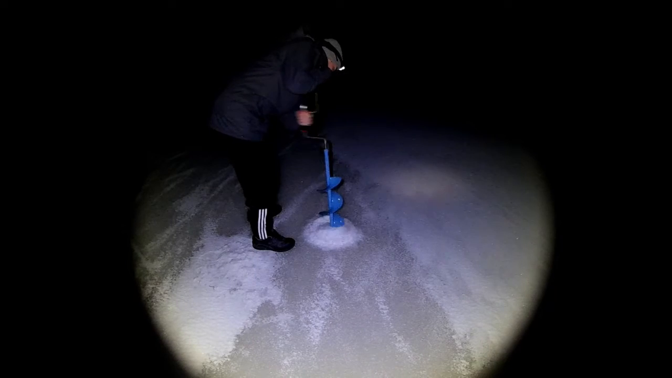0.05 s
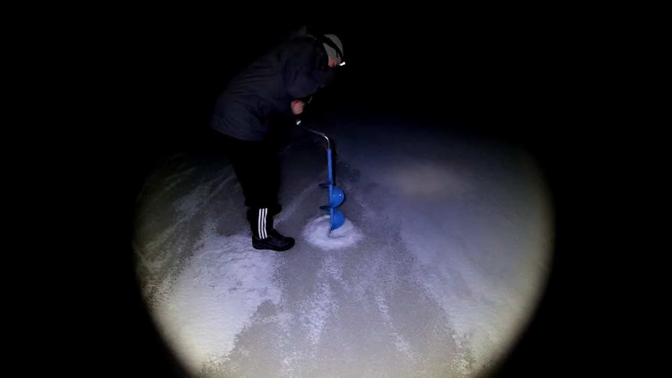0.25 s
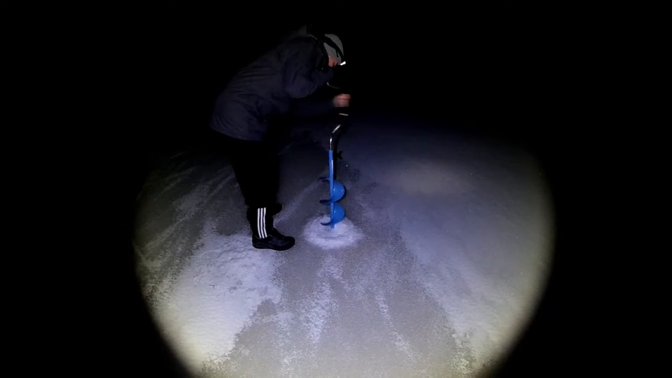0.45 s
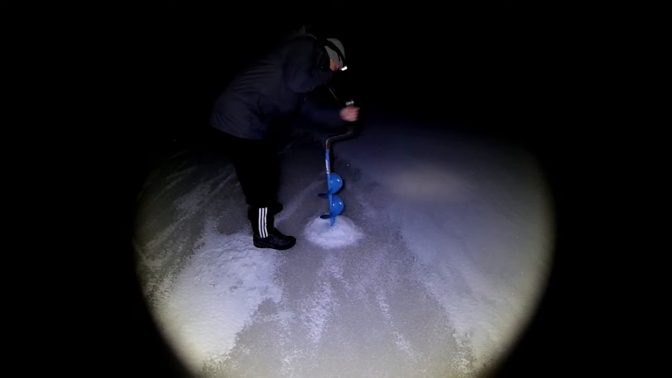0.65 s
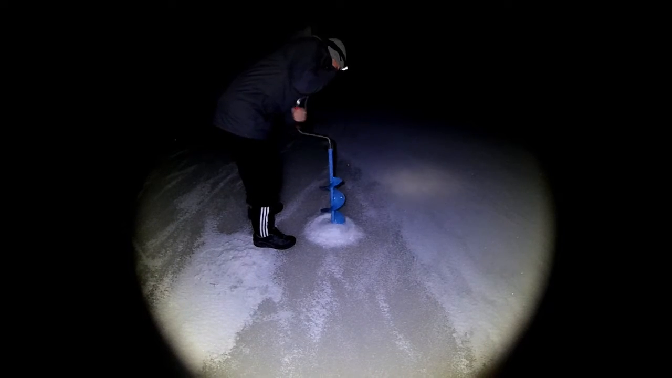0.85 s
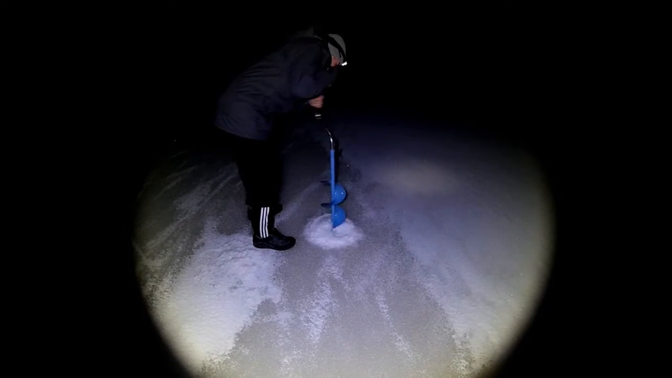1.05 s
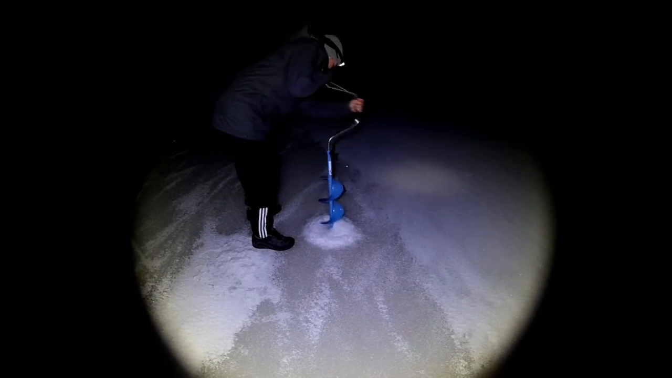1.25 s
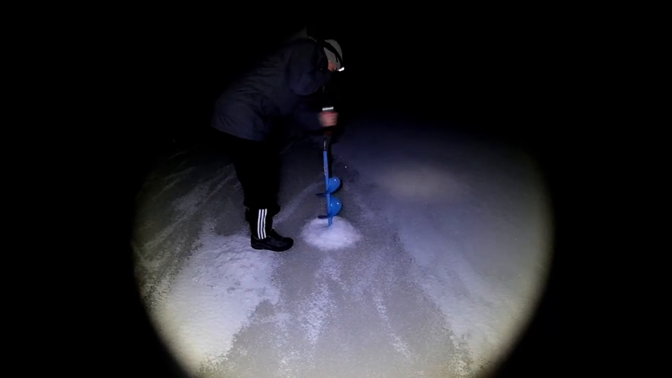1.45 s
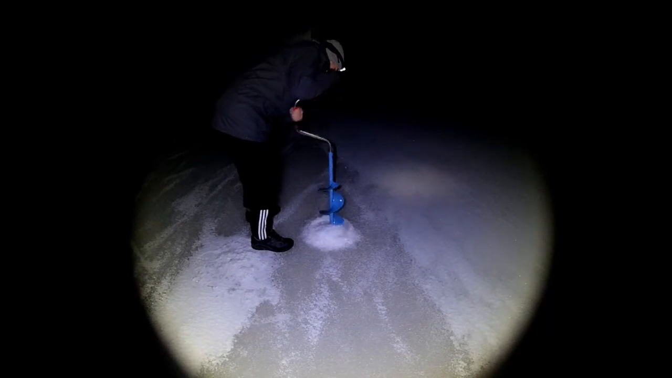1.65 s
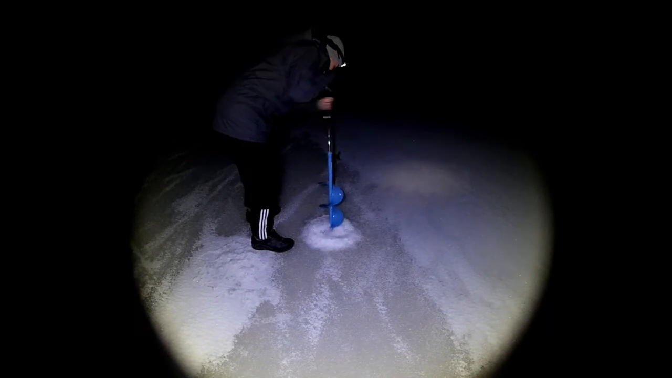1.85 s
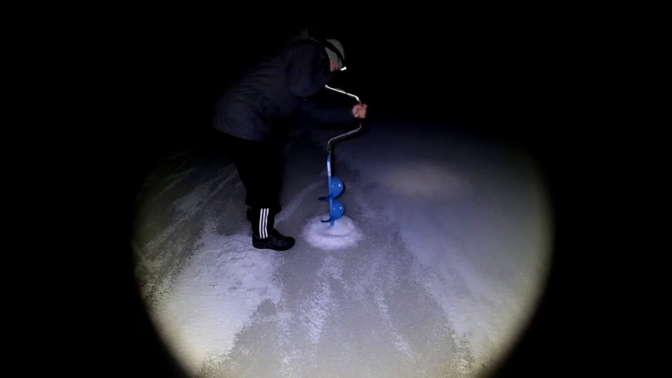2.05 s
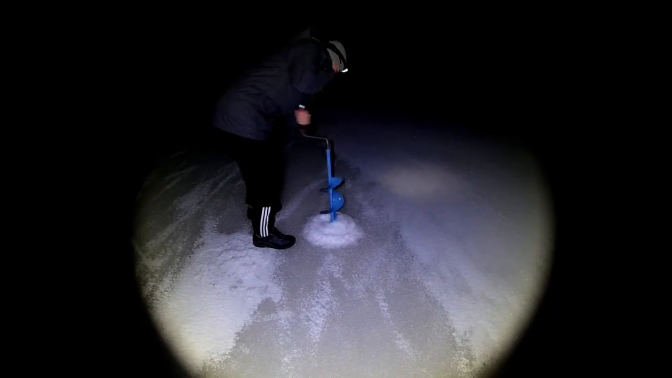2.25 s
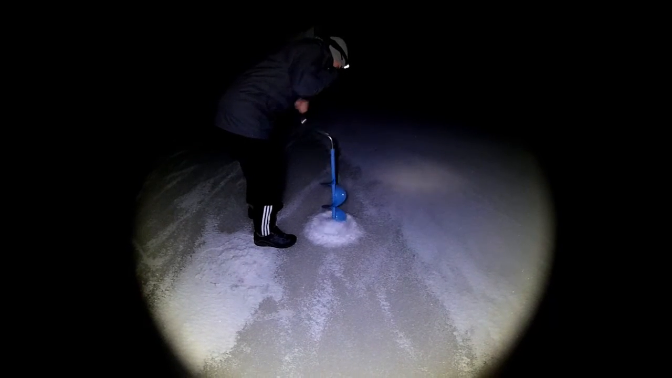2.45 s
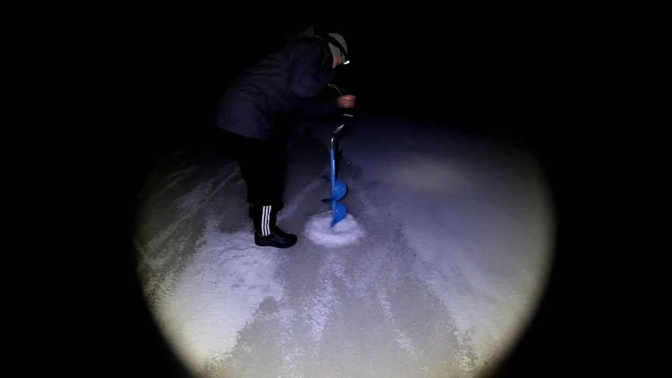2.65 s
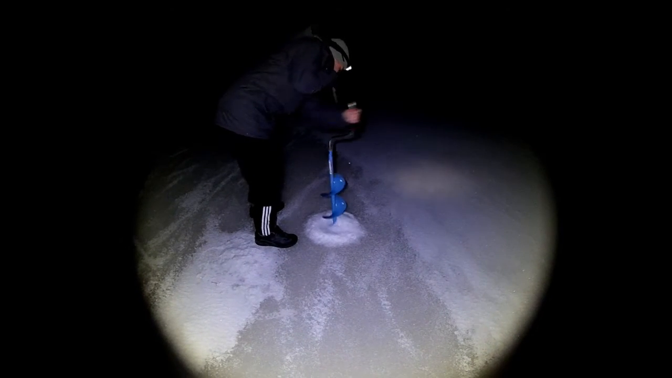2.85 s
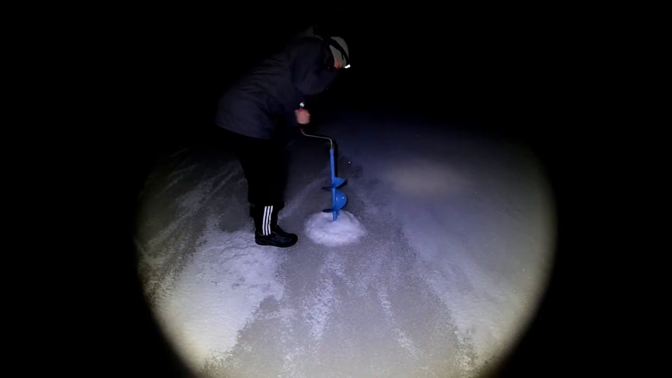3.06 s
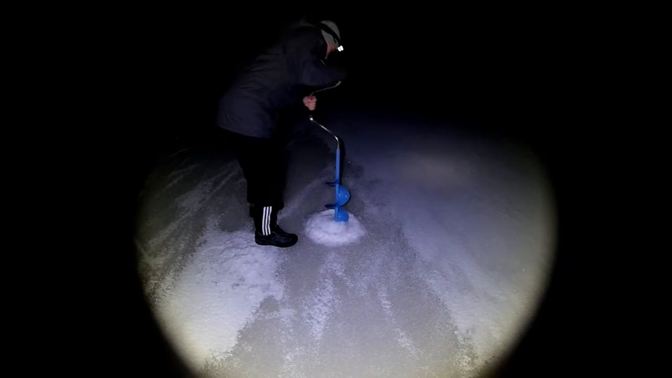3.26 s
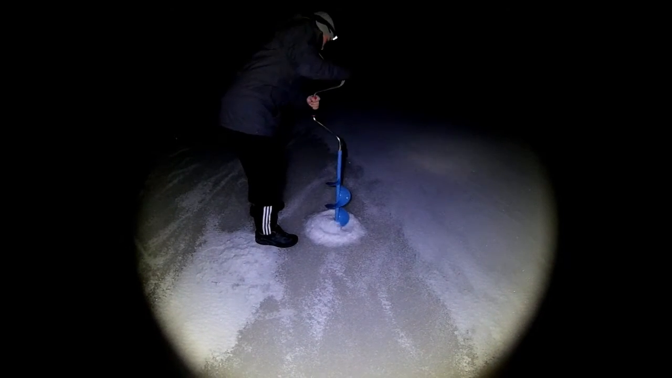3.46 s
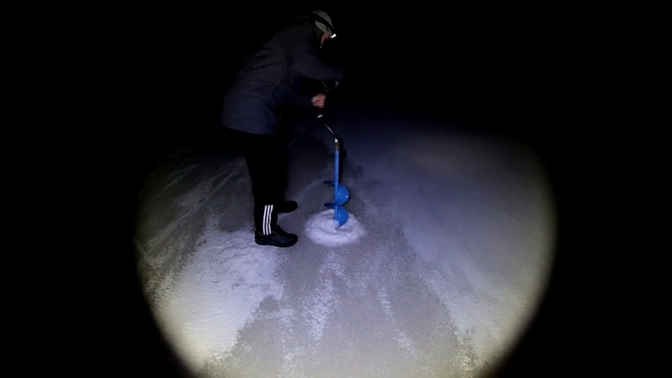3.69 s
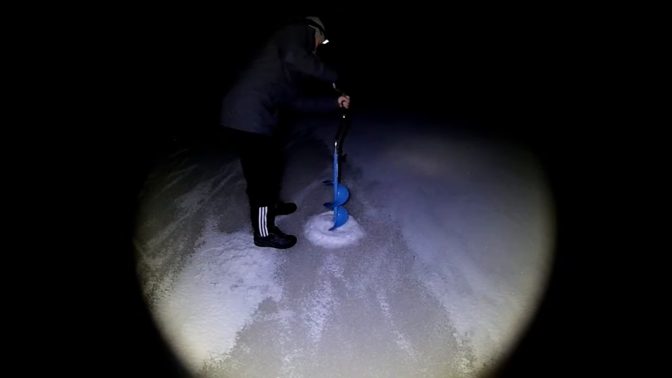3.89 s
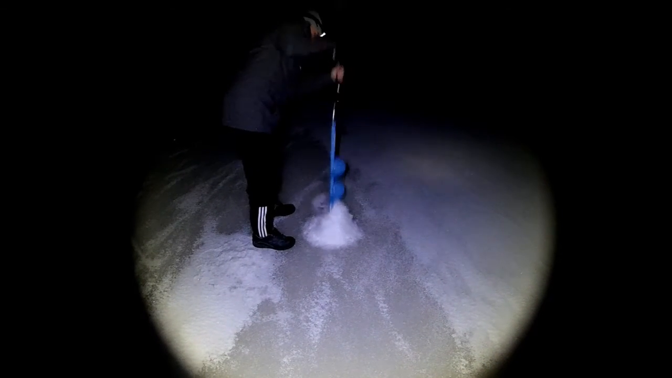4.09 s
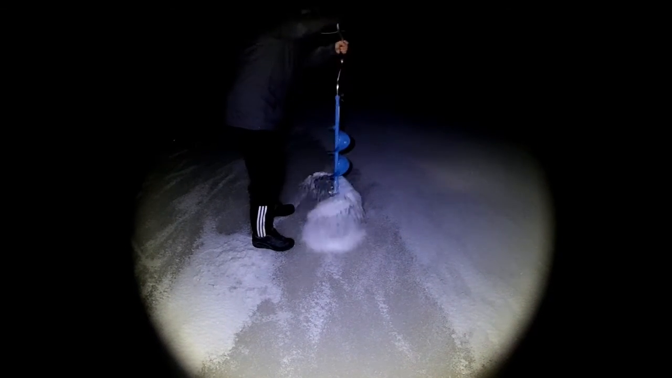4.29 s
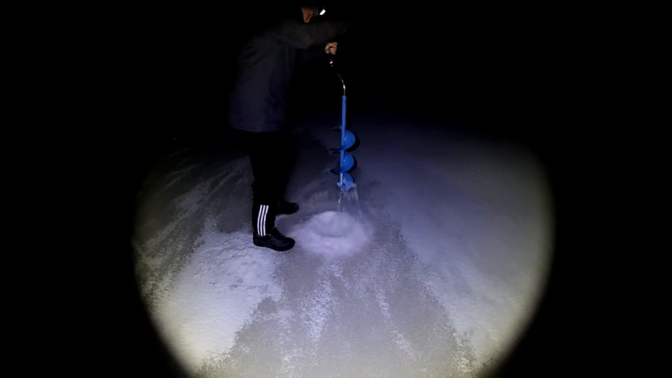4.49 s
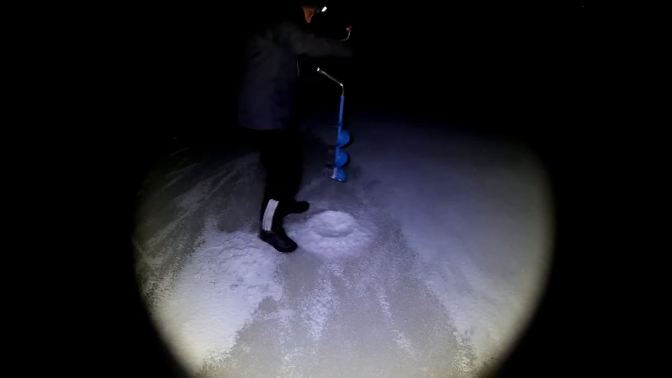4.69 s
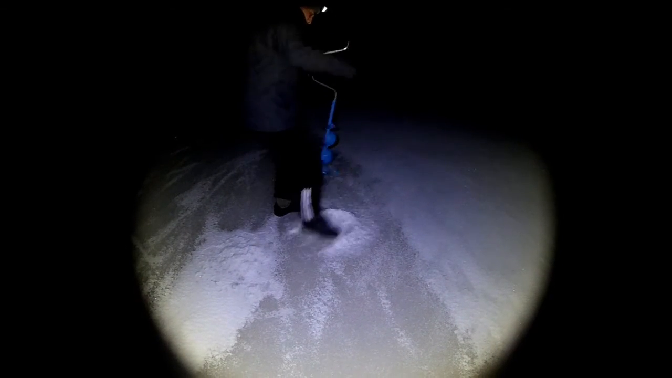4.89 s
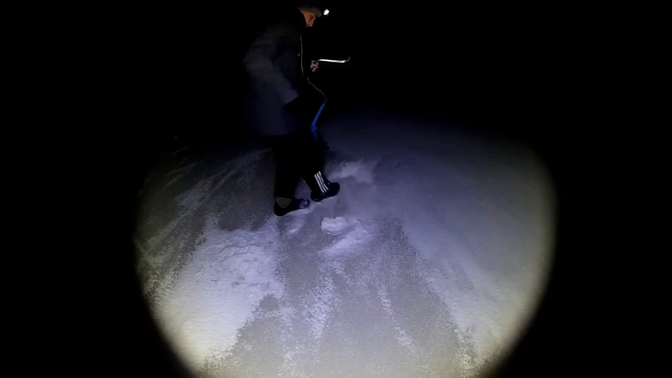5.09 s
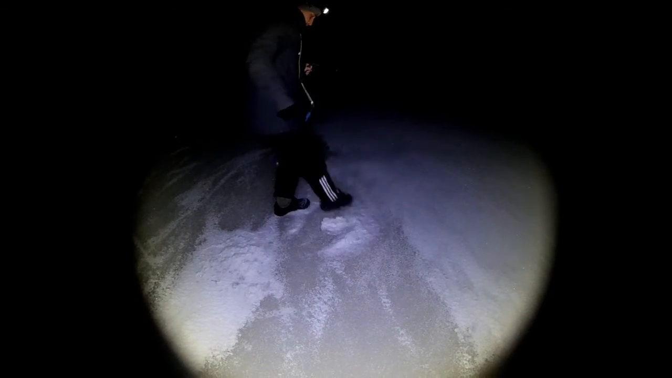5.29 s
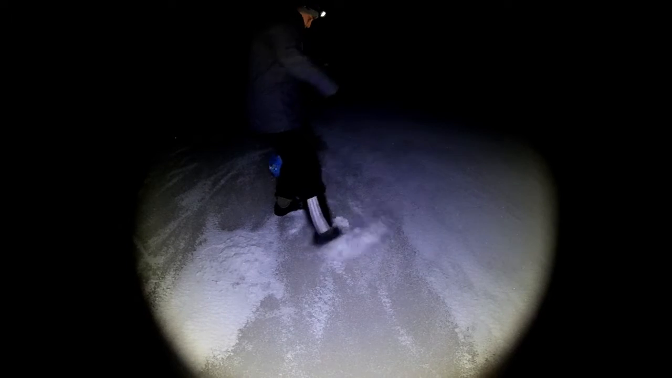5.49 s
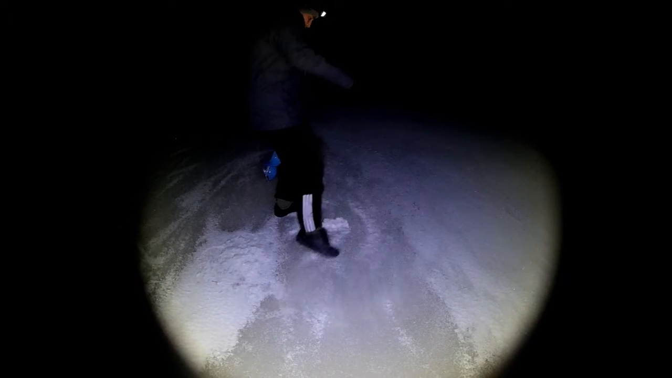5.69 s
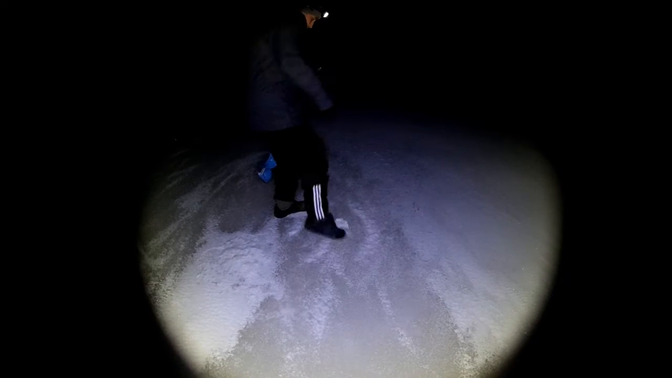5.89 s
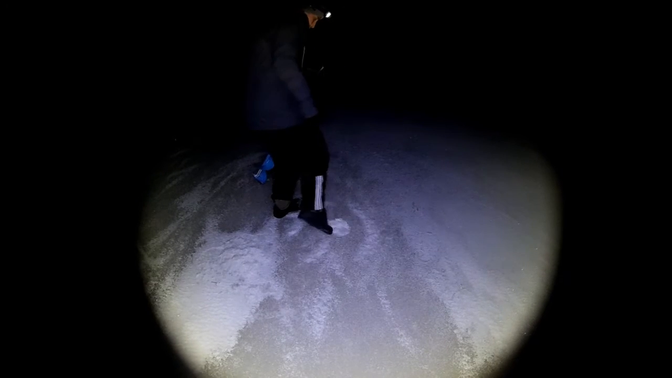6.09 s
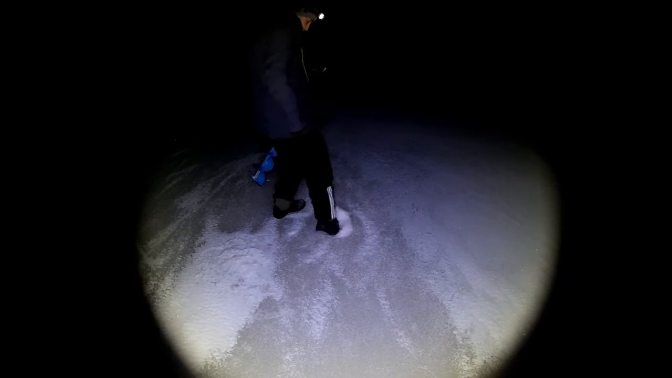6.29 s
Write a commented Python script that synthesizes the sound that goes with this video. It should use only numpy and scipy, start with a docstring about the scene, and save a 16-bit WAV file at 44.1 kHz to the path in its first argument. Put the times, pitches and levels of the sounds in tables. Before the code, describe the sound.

On an open frozen lake, close and without echo, a steel hand auger grinds loudly from the start until about 3.1 s. Each turn lasts roughly 0.75 s: a rough, ringing scrape with upward-gliding resonances, fizzing fine shavings, a tiny very high squeak and a short singing tone near 1200 Hz. Sharp ice cracks jolt the steel, notably around 0.3, 1.0, 1.9, 2.3 and 2.7 s. The crank stalls abruptly; short rasping shoves follow from 3.1 to 3.9 s, the strongest at 3.5 s. From 4.1 to 4.6 s the auger lifts out with wet slush spilling and plopping. Boots scuff and crunch the heap at 4.7-4.85 s with a rising squelch, then again at 5.2-5.4 s with a metallic clank. Softer scuffs, knocks and faint steel pings continue around 5.65 and 6.05 s, while wet grains tick and patter over faint air noise to the end.

```python
"""Drilling a hole in lake ice by hand

A hand auger is cranked through lake ice at night, stalls, and breaks through with a few last shoves. Its blades
chip the ice: each tiny break makes the steel spiral ring, and its resonances glide with every turn. Fine
shavings fizz, the crank squeaks and, once a turn, the blades' stick-slip makes the steel sing. The auger is
pulled out with a spill of slush, boots scuff the heap aside, and wet grains patter on the ice."""
import sys
import numpy as np
from scipy import signal
from scipy.fft import rfft, irfft, next_fast_len
from scipy.io import wavfile
from scipy.ndimage import uniform_filter1d

SR = 44100
rng = np.random.default_rng(int(sys.argv[2]) if len(sys.argv) > 2 else 0)


def to_wav(s):
    """Save 16-bit WAV."""
    ch = np.atleast_2d(s).T  # columns
    pcm = np.round(np.clip(ch, -1, 1) * 32767)  # PCM
    wavfile.write(sys.argv[1], SR, pcm.astype(np.int16))


N = 279594  # length in samples
TIME = np.arange(N) / SR  # s
BINS_HZ = np.fft.rfftfreq(8192, 1 / SR)  # frequencies at which every colour is worked out


def amp(db):
    """Turns decibels into a gain."""
    return 10 ** (np.asarray(db) / 20)


def evened(x):
    """Scales a sound to an rms of one."""
    return x / np.sqrt(np.mean(x ** 2) + 1e-20)


def steady(x, size=1500):
    """Keeps the fine grain of a texture but holds its running level at one; size is in samples."""
    power = uniform_filter1d(uniform_filter1d(x ** 2, size), size)
    return x / np.sqrt(abs(power) + 1e-12)


def add(mix, s, sound):
    """Mixes a sound in at time s."""
    start = max(round(s * SR), 0)
    part = mix[start:][:len(sound)]
    part += sound[:len(part)]


def shape(points, modes=()):
    """Gain in dB over frequency: a broad colour with narrower resonances on top."""
    hz, db = np.transpose(points)
    gain_db = np.interp(np.log(BINS_HZ + 1), np.log(hz), db)
    for centre_hz, width_hz, peak_db in modes:
        gain_db = gain_db + peak_db / (1 + (2 * (BINS_HZ - centre_hz) / width_hz) ** 2)
    return gain_db


def ring(x, gain_db):
    """Each click in x rings with the given spectrum, and nothing sounds before its click."""
    log_gain = np.log(amp(np.r_[gain_db, gain_db[-2:0:-1]]))
    # the Hilbert transform supplies the phase that packs the response right after the click
    response = np.fft.ifft(np.exp(np.conj(signal.hilbert(log_gain)))).real
    return signal.oaconvolve(x, response[:len(response) // 2])[:len(x)]


def wander(rate_hz):
    """Smooth random curve of rms one; variations faster than about rate_hz fade out."""
    size = next_fast_len(N, True)
    hz = np.fft.rfftfreq(size, 1 / SR)
    spectrum = rfft(rng.standard_normal(size)) / (1 + (hz / rate_hz) ** 4)
    return evened(irfft(spectrum, size)[:N])


def grains(per_s, spread_db):
    """Random clicks from tiny fractures: many small, a few large."""
    chance, strength = rng.random((2, N))
    at = np.flatnonzero(chance < per_s / SR)
    excess = np.minimum(-np.log(1 - strength[at]), 4)  # the largest are capped
    train = np.zeros(N)
    train[at] = amp(spread_db * excess) * (-1.) ** (at % 2)  # pushes and pulls alike
    return train


def burst(t60, gain_db, snap):
    """One snap and a shower of splinters, fading 60 dB in t60 seconds, ring a body; peak of one."""
    t = TIME[:SR // 4]
    force = rng.standard_normal(len(t)) * amp(-60 * t / max(t60, 1e-3))
    force[0] += snap
    sound = ring(force, gain_db)
    return sound / abs(sound).max()


def stroke(s, hold, rise, fall):
    """Gain of one move: swells up to time s, holds, dies away; rise and fall are the times for 20 dB."""
    early = np.maximum(s - TIME, 0)
    late = np.maximum(TIME - s - hold, 0)
    return amp(-20 * np.minimum(early / rise + late / fall, 10))


def together(gains):
    """Separate moves add in power."""
    return np.sqrt(sum(gain ** 2 for gain in gains))


# colour of the night air: (frequency [Hz], relative level [dB per Hz])
AIR_COLOUR = [(12, -33), (20, -6), (113, -5), (187, -8), (527, -16.5), (759, -15.5), (849, -18.5),
              (1570, -15), (3250, -28.5), (5680, -34.5), (6180, -34), (12800, -36), (16000, -41)]
AIR_DB = -45


def air():
    """Random noise, coloured to a faint steady rumble and hiss over the open lake."""
    return amp(AIR_DB) * evened(ring(rng.standard_normal(N), shape(AIR_COLOUR)))


# the largest drops tick on the ice: (time [s], peak level before a 5.5 dB lift [dB])
DRIPS = [(5.5567, -23), (5.6181, -23.5), (5.6396, -22), (5.709, -18), (5.8536, -24), (5.9352, -23),
         (5.9983, -23), (6.025, -23), (6.0533, -21), (6.1115, -18), (6.1986, -16.5), (6.2444, -23),
         (6.2715, -24)]
# colour of the ticks: (frequency [Hz], relative level [dB])
DRIP_COLOUR = [(1000, -13), (3500, -1), (7500, -9.5), (8600, 2), (9600, 4), (12000, -10), (15500, 1)]
# loose grains set in around the boots: full level from this time, after rising 20 dB per rise time
PATTER_S, PATTER_RISE_S, PATTER_DB = 5.63, .25, -45


def drips():
    """Drops and grains hit bare ice with sharp ticks, each with its own ping, over a finer patter."""
    out = np.zeros(N)
    for (s, db), (tune, ping) in zip(DRIPS, rng.random((len(DRIPS), 2))):
        colour = shape(DRIP_COLOUR, [(8850 + 600 * tune, 450, 11 * ping)])
        add(out, s, amp(db + 5.5) * burst(.006, colour, snap=7))
    patter = ring(grains(per_s=210, spread_db=5), shape(DRIP_COLOUR, [(9050, 320, 8.4)]))
    patter_db = PATTER_DB - 20 * np.maximum(PATTER_S - TIME, 0) / PATTER_RISE_S
    return out + steady(patter, size=9000) * amp(patter_db)


def fizz(gain, colour, hiss_db, bubble_db):
    """Fine crystals hiss, and tiny bubbles burst in the slush, sharing sixteen high pitches."""
    hiss = steady(ring(grains(per_s=7000, spread_db=2.5), shape(colour)))
    t = TIME[:SR // 100]
    pips = np.zeros(N)
    for hz in np.linspace(8600, 15400, num=16) + rng.uniform(-200, 200, size=16):
        pip = np.sin(2 * np.pi * hz * t) * np.exp(-t / 0.0026)
        pips += signal.oaconvolve(grains(per_s=12, spread_db=4), pip)[:N]
    bubbles = evened(ring(pips, shape(colour)))
    return (amp(hiss_db) * hiss + amp(bubble_db) * bubbles) * gain


# slush sprays from the lifted spiral and from the boots:
# (time [s], hold [s], rise [s per 20 dB], fall [s per 20 dB], level before the hiss and bubble mix [dB])
SPRAYS = [(4.28, .06, .48, .26, -43.5), (4.7, .05, .16, .2, -52), (4.84, .02, .05, .1, -46),
          (4.96, .35, .12, .3, -46), (5.44, .08, .03, .1, -48), (5.55, .2, .08, .12, -42),
          (5.82, .05, .06, .1, -43), (5.9, .44, .05, .1, -48)]
# colour of the spray: (frequency [Hz], relative level [dB])
SPRAY_COLOUR = [(3000, -6.5), (6000, -9.5), (7500, -22), (8300, -16), (9000, -3.5), (9600, -11),
                (10300, -2), (11400, -14), (12300, -1), (13600, 1), (14200, -5), (15400, -2), (16000, -5)]


def spray():
    """Flying slush: the fizz of crystals and bubbles swells with each move."""
    gain = together(amp(db) * stroke(s, hold, rise, fall) for s, hold, rise, fall, db in SPRAYS)
    return fizz(gain, SPRAY_COLOUR, hiss_db=1.0, bubble_db=-5.5)


# colour of weight coming onto the ice: (frequency [Hz], relative level [dB])
WEIGHT_COLOUR = [(40, -26), (110, -10.5), (220, 3), (320, 4.5), (450, -2.5), (700, -21), (2000, -35)]
TRICKLE_WEIGHT_DB = -11  # thud under the gain between moves


def crunching(moves, colour, rest):
    """Wet snow crunches in clumps, with a low thud where weight comes on; rest is its gain between moves."""
    grit, weight = [rest], [amp(TRICKLE_WEIGHT_DB) * rest]
    for s, hold, rise, fall, db, weight_db in moves:
        move = stroke(s, hold, rise, fall)
        grit.append(amp(db) * move)
        weight.append(amp(weight_db) * move)
    crush = grains(per_s=1800, spread_db=0.9) * amp(2.4 * wander(rate_hz=100))
    crunch = steady(ring(crush, colour)) * together(grit)
    thud = steady(ring(crush, shape(WEIGHT_COLOUR))) * together(weight)
    return amp(0.1) * crunch + amp(-0.9) * thud


# slush spills from the lifted spiral: (time [s], hold [s], rise [s per 20 dB], fall [s per 20 dB],
# crunch level before the mix [dB], weight level before the mix [dB])
SPILLS = [(4.132, .012, .03, .07, -33.5, -48), (4.225, .13, .02, .05, -42, -55),
          (4.407, .026, .012, .018, -29.5, -38), (4.518, .028, .01, .035, -29.5, -33.5)]
# lifted slush keeps trickling back: (time [s], crunch level before the mix [dB])
TRICKLE = [(3.87, -75), (3.93, -43), (4.03, -51), (4.2, -46.5), (4.58, -57), (4.95, -47), (5.13, -44),
           (5.5, -50), (5.85, -46), (6.34, -46)]
# colour of crunching snow: (frequency [Hz], relative level [dB])
CRUNCH_COLOUR = [(300, -17.5), (470, -28), (620, -.5), (900, 0), (1550, 3.5), (1850, -.5), (2080, -12.5),
                 (2600, -8), (2950, -17), (3650, -13.5), (4000, -29), (5600, -24.5), (7300, -52),
                 (16000, -86)]
# wet slush lacks the crisp band: (frequency [Hz], width [Hz], change [dB])
SOGGY = [(3100, 1700, -7.5)]


def slush():
    """Soggy shavings crunch as they slide off the lifted spiral, and keep trickling."""
    trickle = amp(np.interp(TIME, *np.transpose(TRICKLE)))
    return crunching(SPILLS, shape(CRUNCH_COLOUR, SOGGY), rest=trickle)


# boots scuff the heap aside: (time [s], hold [s], rise [s per 20 dB], fall [s per 20 dB],
# crunch level before the mix [dB], weight level before the mix [dB])
SCUFFS = [(4.614, .05, .02, .1, -33, -40), (4.715, .035, .13, .08, -21, -31.5),
          (4.79, .025, .05, .085, -24, -30), (4.85, .024, .05, .035, -30, -37),
          (4.944, .01, .01, .025, -34.5, -43), (5.125, .03, .04, .06, -41, -45),
          (5.196, .02, .018, .05, -24.5, -48), (5.273, .048, .012, .1, -27, -31.5),
          (5.368, .04, .08, .09, -25, -34.5), (5.652, .06, .13, .07, -30.5, -39.5),
          (6.035, .025, .13, .07, -29.5, -37), (6.287, .04, .03, .1, -41, -45)]


def boots():
    """Soles push the heap of shavings away from the hole, crushing its grains."""
    return crunching(SCUFFS, shape(CRUNCH_COLOUR), rest=0)


# a boot presses into wet slush
SQUELCH_S, SQUELCH_HZ, SQUELCH_OCTAVES_PER_S, SQUELCH_DB = 4.797, 335, 62, -23.5  # Hz at that time
SQUELCH_HOLD_S, SQUELCH_RISE_S, SQUELCH_FALL_S = .02, .025, .01  # rise and fall are for 20 dB


def squelch():
    """A pocket of wet slush closes under the sole: a rough resonance that rises in pitch."""
    octaves = np.clip(SQUELCH_OCTAVES_PER_S * (TIME - SQUELCH_S), -.2, 1.35)
    phase = 2 * np.pi * np.cumsum(SQUELCH_HZ * 2 ** octaves) / SR
    pocket = wander(rate_hz=110) * np.cos(phase) + wander(rate_hz=110) * np.sin(phase)
    press = stroke(SQUELCH_S, SQUELCH_HOLD_S, SQUELCH_RISE_S, SQUELCH_FALL_S)
    return amp(SQUELCH_DB) * steady(pocket, size=600) * press


# slush lumps land and boots knock:
# (time [s], peak level of the crunch [dB], time to fade 60 dB [s], thud relative to the crunch [dB])
KNOCKS = [(4.133, -33, 0.028, -10), (4.298, -20, 0.021, -17), (4.332, -19.5, 0.028, -17),
          (4.407, -28, 0.037, -4), (4.457, -25, 0.028, -7), (4.49, -29, 0.06, -10),
          (4.519, -20, 0.028, -10), (4.595, -30, .03, -8), (4.814, -14, 0.024, -10),
          (4.942, -21, 0.028, -15), (4.988, -23, 0.028, -21), (5.197, -14, .04, -20),
          (5.271, -18.5, 0.028, -10), (5.655, -22, 0.028, -12), (5.896, -24, 0.031, -17),
          (6.044, -25, 0.028, -17), (6.155, -24, 0.022, -13)]
# the steel rings briefly: first a rasp while the auger is stalled, later clanks of auger and handle:
# (time [s], level before the soft start [dB], frequency [Hz], time to fade 60 dB [s])
CLANKS = [(3.368, -34, 2780, .07), (5.206, -19, 1020, 0.17), (5.204, -28, 2850, .07),
          (5.55, -39, 1026, .14), (5.615, -39, 3620, .12), (5.706, -30, 1115, 0.082),
          (5.792, -28.5, 1096, 0.13), (5.862, -32, 1106, 0.21), (5.935, -32, 1105, .16),
          (6.067, -25, 1026, 0.062)]


def knocks():
    """Slush lumps and boots knock on the ice; the steel rings in short, fading tones."""
    out = np.zeros(N)
    for s, db, t60, thud_db in KNOCKS:
        crunch = burst(t60, shape(CRUNCH_COLOUR, SOGGY), snap=10.3)
        thud = burst(t60, shape(WEIGHT_COLOUR), snap=17)
        add(out, s, amp(db) * (crunch + amp(thud_db) * thud))
    t = TIME[:SR // 3]
    for s, db, hz, t60 in CLANKS:
        soft_start = 1 - np.exp(-t / .003)
        add(out, s, amp(db - 60 * t / t60) * soft_start * np.sin(2 * np.pi * hz * t))
    return out


# colour of the fine shavings: (frequency [Hz], relative level [dB])
SHAVING_COLOUR = [(3000, -27), (6000, 5), (7500, -22), (8300, -16), (9000, 2.5), (9600, -7), (10300, 4.5),
                  (11400, -10), (12300, 1.5), (13600, 0), (14200, 0), (15400, -10), (16000, -7.5)]


def shavings(coarse_gain, fine_gain):
    """Shavings fizz along with the cut, mostly with its fine chips."""
    gain = together([amp(-23) * fine_gain, amp(-33.5) * coarse_gain])
    return fizz(gain, SHAVING_COLOUR, hiss_db=-1.5, bubble_db=-8)


# the blades' stick-slip makes the steel sing once in each of the four full turns heard: # (start time [s],
# length [s], level at full swell before it wavers [dB])
SINGS = [(0.196, 0.19, -16.5), (.87, 0.35, -15.5), (1.63, 0.28, -19.5), (2.451, 0.21, -20)]


def sing():
    """The blades' stick-slip keeps one narrow mode of the steel going, unsteady in strength."""
    phase = 2 * np.pi * np.cumsum(1203 + 8 * wander(rate_hz=30.6)) / SR
    tone = evened(np.sin(phase) * amp(2.9 * wander(rate_hz=36)))
    swell = np.zeros(N)
    for s, length, db in SINGS:
        add(swell, s, amp(db) * signal.windows.tukey(round(length * SR), .8))
    return tone * swell


# start times of the turns, the first before the sound begins;
# the last would begin at 3.9 s, but the crank stalls first: (time [s])
TURNS = [-.71, .03, .775, 1.52, 2.245, 3.0, 3.9]
# stray pips: (time [s], peak level [dB], middle frequency [Hz], length [s])
PIPS = [(3.768, -33, 12600, .014), (4.288, -34, 11300, 0.0066), (5.429, -28, 15500, .008)]
# the crank squeaks as a turn starts; it begins to squeak slightly ahead, by the lead
SQUEAK_HZ, SQUEAK_DB, SQUEAK_LENGTH_S, SQUEAK_LEAD_S = 15500, -40.5, .032, .01
# the turning stops: the cut then drops very fast
STALL_S, STALL_DB_PER_S = 3.068, 330


def squeaks():
    """Very high, wavering tones: one with each turn of the crank until the stall, and a few stray pips."""
    out, waver = np.zeros(N), wander(rate_hz=500)
    crank = [(s - SQUEAK_LEAD_S, SQUEAK_DB, SQUEAK_HZ, SQUEAK_LENGTH_S) for s in TURNS if 0 < s < STALL_S]
    for s, db, hz, length in crank + PIPS:
        pitch = hz * (1 + .015 * waver[(TIME >= s) & (TIME < s + length)])
        tone = np.sin(2 * np.pi * np.cumsum(pitch) / SR)
        add(out, s, amp(db) * np.hanning(len(pitch)) * tone)
    return out


# the blades crack or strike the ice:
# (time [s], peak level before a 6.5 dB cut [dB], time to fade 60 dB [s])
CRACKS = [(.251, 3, .04), (.306, -2, .051), (1.011, -2, .046), (1.856, -1.5, .05), (1.889, 1, .03),
          (1.924, 4.5, .041), (2.301, 2, .073), (2.681, -1, .046), (3.125, -3, .035), (3.168, -15, .053),
          (3.189, -15, .03), (3.276, -30, .035), (3.345, -17, .035), (3.367, -15, .032), (3.447, -22, .059),
          (3.484, -9, .03), (3.522, -1, .04), (3.751, -22, .05), (3.773, -19, .043), (3.858, -10, .018)]
# broad colour of the auger in its hole: (frequency [Hz], relative level [dB])
STEEL_COLOUR = [(50, -50), (90, -25), (120, -28), (165, -18), (280, -13), (460, -24), (590, -6.5),
                (850, -12), (1250, -5), (1900, -8.5), (2500, -20), (3700, -22), (4000, -34), (5900, -35.5),
                (7300, -54), (16000, -47.5)]
# ringing modes of the auger: (frequency [Hz], width [Hz], level above the colour [dB])
STEEL_MODES = [(610, 58, 10.3), (675, 44, 4), (768, 40, 3), (781, 59, 7), (915, 40, 5.5), (980, 40, 8),
               (1108, 91, 6), (1196, 74, 9.5), (1366, 53, 2.5), (1462, 56, 7.5), (2175, 55, 4.5),
               (2603, 110, 6.5), (3145, 75, -15), (3480, 160, 7)]


def cracks():
    """Larger pieces of ice give way under a blade and jolt the steel, which rings."""
    out, body = np.zeros(N), shape(STEEL_COLOUR, STEEL_MODES)
    for s, db, t60 in CRACKS:
        add(out, s, amp(db - 6.5) * burst(t60, body, snap=2.4))
    return out


# the arm bears down alike in every turn, before the changes in pressure below:
# (share of a turn [0 to 1], level [dB], level of the fine chips [dB])
BITE = [(.09, -13.3, -21.5), (.2, -16.5, -26.5), (.33, -13.6, -26), (.52, -12.9, -24.5),
        (.71, -14.3, -21.8), (.86, -15.3, -26), (.97, -13.4, -26)]
# the blades skid or dig in for a moment: (time [s], half length [s], change in level [dB])
SKIDS = [(.115, .025, -4), (.41, .03, 2), (.48, .03, -1.5), (.84, .025, 3), (1.41, .05, -2.3),
         (1.655, .025, -3.2), (2.41, .025, -3), (2.8, .2, 2.1)]
# shoves on the stalled crank, before the blades' mix:
# (time [s], hold [s], level [dB], level of the fine chips [dB])
SHOVES = [(3.128, .023, -24, -39), (3.174, .018, -30.5, -48), (3.32, .01, -44, -54),
          (3.344, .008, -35, -37.5), (3.369, .009, -36, -39), (3.487, .027, -23, -31),
          (3.524, .102, -14, -23.5), (3.642, .042, -20, -34), (3.779, .016, -31, -45),
          (3.8, .038, -28.5, -39.5), (3.859, .021, -17, -28), (3.895, .012, -34, -47)]
SHOVE_RISE_S, SHOVE_FALL_S = .01, .021  # time for 20 dB
LEAN_DB, FINE_LEAN_DB = 1.0, .8  # pressure at the outset, and extra for the fine chips
TIRING_DB_PER_S = .7  # the cut eases as the hole deepens
DULLING_DB_PER_S = .55  # the deepening hole also swallows the fine chips
CREAK_S, CREAK_HOLD_S, CREAK_DB = 3.15, .75, -54  # the stalled auger creaks faintly in its hole


def cutting():
    """Gains of the coarse cut and fine chips: the same bite in each turn until the stall, then shoves."""
    turn = np.interp(TIME, TURNS, np.arange(len(TURNS)))
    share, coarse_db, fine_db = np.transpose(BITE)
    lean_db = LEAN_DB - TIRING_DB_PER_S * TIME - STALL_DB_PER_S * np.maximum(TIME - STALL_S, 0)
    for s, half_length, db in SKIDS:
        lean_db = lean_db + db * np.exp(-((TIME - s) / half_length) ** 2)
    fine_lean_db = lean_db + FINE_LEAN_DB - DULLING_DB_PER_S * TIME
    coarse = [amp(lean_db + np.interp(turn, share, coarse_db, period=1))]
    fine = [amp(fine_lean_db + np.interp(turn, share, fine_db, period=1))]
    coarse.append(amp(CREAK_DB) * stroke(CREAK_S, CREAK_HOLD_S, SHOVE_RISE_S, SHOVE_FALL_S))
    for s, hold, db, chips_db in SHOVES:
        shove = stroke(s, hold, SHOVE_RISE_S, SHOVE_FALL_S)
        coarse.append(amp(db) * shove)
        fine.append(amp(chips_db) * shove)
    return together(coarse), together(fine)


# resonances of the turning spiral: (middle [share of a turn], length [turns], frequency [Hz],
# glide [octaves per turn], width [Hz], boost [dB])
GLIDES = [(0.49, 0.085, 1550, 1.5, 100, 6), (0.73, 0.085, 2030, 0.6, 220, 7.5),
          (0.76, .08, 2720, .3, 120, 9), (0.68, 0.08, 1500, 0.71, 110, 4), (.97, 0.19, 930, 0.046, 60, 6.5),
          (.05, 0.12, 3000, 0.33, 340, 4.5), (.94, 0.07, 1520, 0.42, 110, 6),
          (0.34, 0.05, 1970, 0.38, 68, 3.5), (.55, .09, 2850, .2, 200, 4),
          (0.09, .08, 2300, 0.27, 180, 6.5)]


def spiral(x):
    """The turning flight sweeps its resonances upward; the level also varies in small random patches."""
    hz, t, z = signal.stft(x, SR, nperseg=1024, noverlap=768)
    turn = np.interp(t, TURNS, np.arange(len(TURNS)))
    for middle, length, centre_hz, glide, width_hz, db in GLIDES:
        off = (turn - middle + .5) % 1 - .5  # turns away from the nearest middle
        away = (hz[:, None] - centre_hz * 2 ** (glide * off)) / width_hz
        z = z * amp(db * np.exp(-away ** 2 - (off / length) ** 2))
    # random patches over time and frequency
    patches = rng.standard_normal(z.T.shape)
    patches = uniform_filter1d(patches, size=5, axis=0)
    patches = uniform_filter1d(patches, size=4, axis=1)
    z = z * amp(2.4 * evened(patches).T)
    return signal.istft(z, SR, nperseg=1024, noverlap=768)[1][:N]


# the auger rings differently once its blades jam in the last ice:
# (frequency [Hz], width [Hz], level above the colour [dB])
JAMMED_MODES = [(168, 70, 1.5), (612, 110, 10), (773, 85, 9), (960, 100, 9.5), (1195, 105, 8.5),
                (1575, 100, 3.5), (1860, 140, 3.5), (2020, 120, -5), (2530, 630, 10.5), (2980, 260, -9.5),
                (3550, 230, 3.5), (4800, 230, 8), (5520, 260, 7)]
JAM_S = 3.28


def blades(coarse_gain, fine_gain):
    """The blades stick and slip, breaking off chips that ring the steel; jammed, they tear more coarsely."""
    chips = grains(per_s=5000, spread_db=1.5) * amp(0.82 * wander(rate_hz=79))
    tearing = grains(per_s=2500, spread_db=2.0) * amp(2.0 * wander(rate_hz=76))
    turning = evened(spiral(ring(chips, shape(STEEL_COLOUR, STEEL_MODES))))
    jammed = evened(ring(tearing, shape(STEEL_COLOUR, JAMMED_MODES)))
    steel = np.where(TIME < JAM_S, turning, jammed)
    # below about 2 kHz is the coarse cut, the rest is the fine chips
    low_pass = signal.butter(4, 2000, fs=SR, output="sos")
    coarse = signal.sosfiltfilt(low_pass, steel)
    fine = steel - coarse
    judder = amp(.6 * wander(rate_hz=30))
    return judder * (amp(-0.6) * steady(coarse) * coarse_gain + amp(-0.34) * steady(fine) * fine_gain)


def scene():
    """Adds all sources without echo: there are no walls on the lake."""
    coarse_gain, fine_gain = cutting()
    background = air() + drips()
    clearing = spray() + slush() + boots() + squelch() + knocks()
    drilling = shavings(coarse_gain, fine_gain) + sing() + squeaks() + cracks() + blades(coarse_gain, fine_gain)
    return (background + clearing + drilling)[None]


EDGE_HZ = 15850  # upper limit of the sound


def record(dry):
    """Rounds off the highest peaks towards full scale, then removes what lies above the band limit."""
    held = dry / (1 + dry ** 8) ** (1 / 8)
    low_pass = signal.firwin(511, EDGE_HZ, window=("kaiser", 9), fs=SR)
    return signal.oaconvolve(held, low_pass[None], "same")


dry = scene()
out = record(dry)
to_wav(out)
```